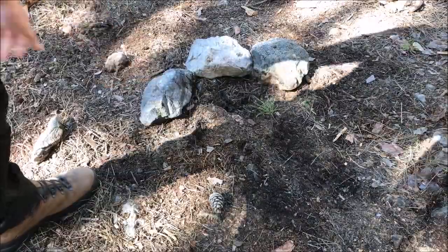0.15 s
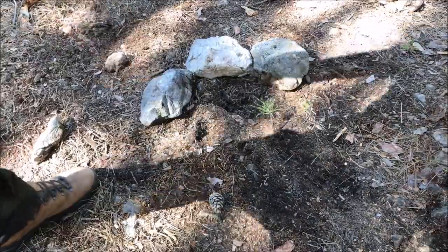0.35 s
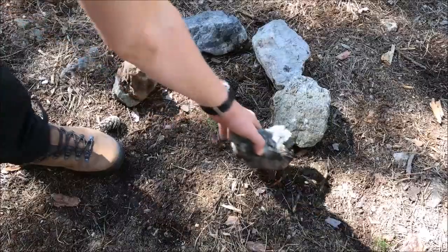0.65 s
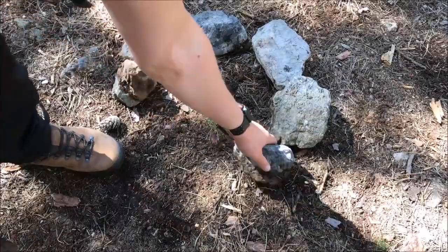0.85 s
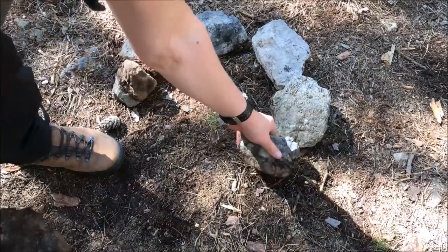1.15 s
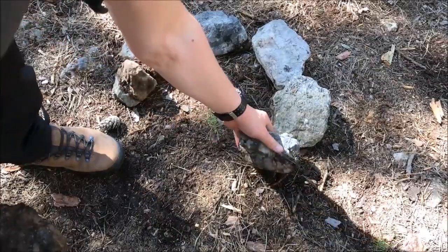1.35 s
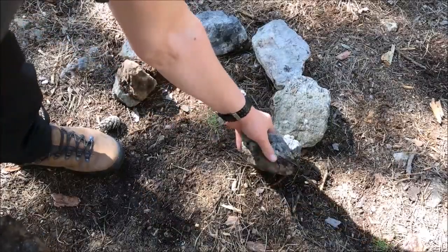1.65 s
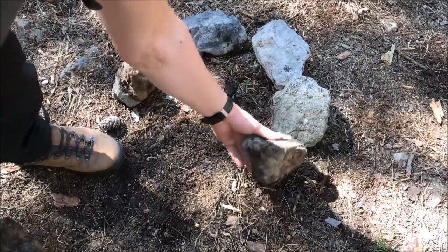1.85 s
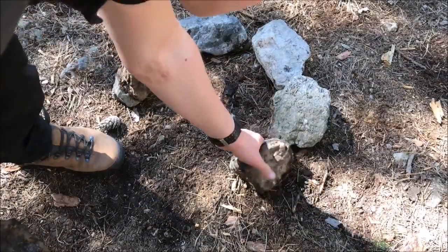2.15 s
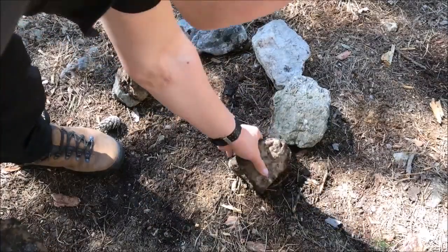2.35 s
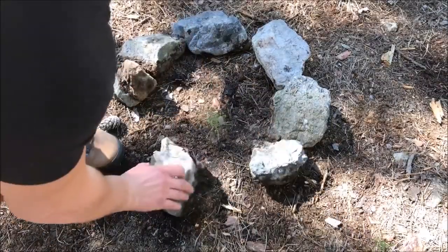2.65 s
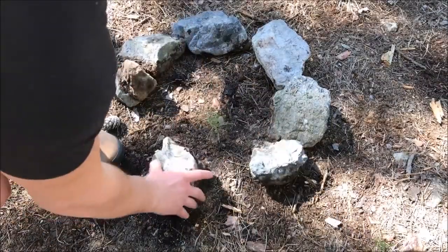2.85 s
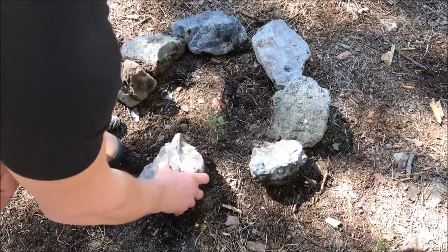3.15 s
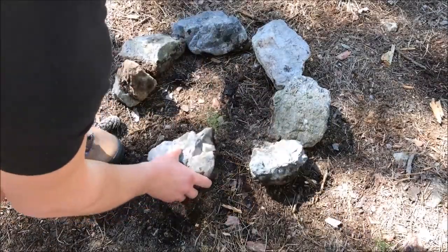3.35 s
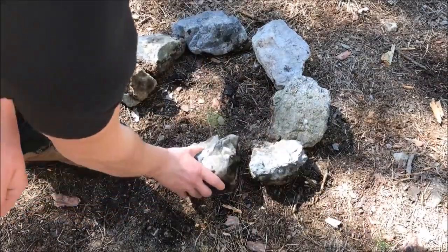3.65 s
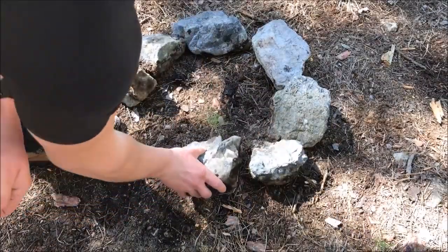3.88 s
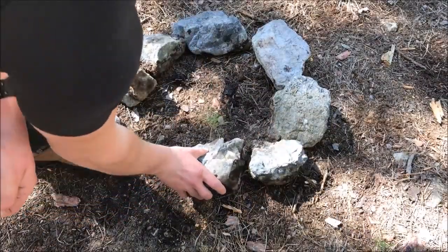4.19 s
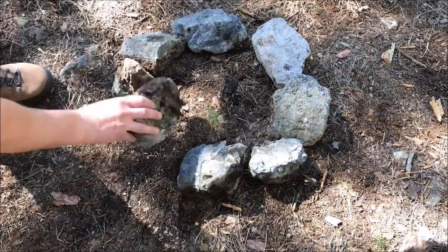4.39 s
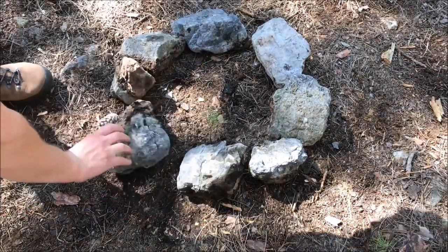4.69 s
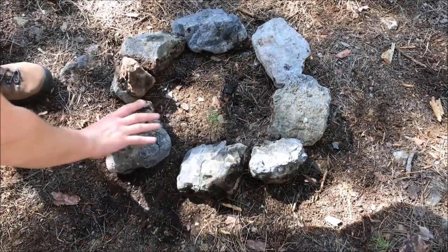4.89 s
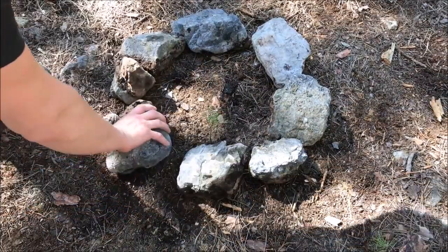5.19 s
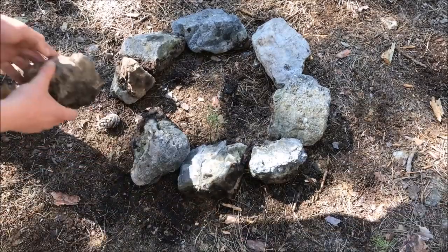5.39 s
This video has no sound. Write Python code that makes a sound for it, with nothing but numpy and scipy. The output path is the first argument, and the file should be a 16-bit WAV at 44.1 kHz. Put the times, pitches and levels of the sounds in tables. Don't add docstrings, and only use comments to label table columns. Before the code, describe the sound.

Faint pebble ticks and dry needle rustle lead to a hard stone knock just before one second, by far the sharpest. Softer knocks with dull soil thuds follow around two and two and a half seconds, a crisp snap near 3.8, and a heavy double clack and thump near 4.7. Close small single-channel microphone on dry open forest ground, with no room echo.

```python
import sys
import numpy as np
from scipy import signal
from scipy.fft import rfft, irfft, next_fast_len
from scipy.io import wavfile

SR = 44100
rng = np.random.default_rng(int(sys.argv[2]) if len(sys.argv) > 2 else 0)


def makeup_ratio(level_db):
    decades = np.asarray(level_db, float) / 20
    return 10 ** decades


def generate_wav(signal):
    frames = np.transpose(np.atleast_2d(signal))
    scaled = np.clip(frames, -1, 1) * 32767
    pcm = np.round(scaled).astype(np.int16)
    wavfile.write(sys.argv[1], SR, pcm)


N = 243720

# start_s [s, peak of the low click, start of the grit], peak_db
# [dB], pitch_hz [Hz], # upper_db [dB, upper click against peak], echo_db [dB against peak]
STONE_KNOCKS = [(.8797, -7.5, 1110, -21.5, -30), (.8819, -20, 1150, -22, -10),
                (0.8873, -32, 518.7, -42.5, -21.5), (0.9238, -42.5, 495, -24, -2),
                (1.2613, -46.5, 950, -35, -23), (1.2631, -55.5, 400, -40, -0.5),
                (2.0845, -19.5, 984, -21.5, -19), (2.0918, -30, 955, -33, -15),
                (2.1168, -25.5, 790, -21, -12), (2.1198, -35, 1050, -10, -4), (2.5515, -25, 787, -24, -8.5),
                (2.5543, -31.5, 380, -40, -13.5), (4.6589, -19.5, 1300, -36, -30),
                (4.6605, -17.5, 2250, -36, -18), (4.6611, -22, 950, -40, -30), (4.6631, -26, 950, -40, -30),
                (4.6642, -29, 900, -40, -12), (4.6638, -26.5, 296, -41.5, -24)]
# start_s [s, peak of the low click, start of the grit], peak_db [dB],
# pitch_hz [Hz]
PEBBLE_TICKS = [(.245, -58, 900), (.268, -59, 1300), (.29, -57, 1300), (.315, -54.5, 1200),
                (.343, -54, 1400), (.372, -56, 1250), (.4045, -49.5, 910), (.434, -53, 970),
                (.7555, -50.5, 567), (.857, -55, 1050), (.868, -57, 1100), (1.844, -57, 1551),
                (1.85, -57, 1500), (1.857, -52, 1510), (2.321, -58, 1100), (2.326, -54, 500),
                (3.7699, -49, 1200), (3.825, -60, 990), (4.4036, -48, 350), (4.43, -60, 1000),
                (4.723, -50.5, 810), (4.751, -49, 1000), (4.772, -53, 1150), (4.85, -55, 900),
                (4.865, -46, 720), (5.159, -63, 900), (5.427, -56, 1040)]


def knocks():
    out = np.zeros(N)
    t = np.arange(2600) / SR
    tick_upper_db, tick_echo_db = -14.5, -12
    ticks = [(*row, tick_upper_db, tick_echo_db) for row in PEBBLE_TICKS]
    for start_s, peak_db, pitch_hz, upper_db, echo_db in STONE_KNOCKS + ticks:
        click_s = start_s - .003
        low_click = click(pitch_hz, cycles=0.8 * (pitch_hz / 1100) ** 0.57)
        add(out, makeup_ratio(peak_db) * low_click, click_s)
        add(out, makeup_ratio(peak_db + upper_db) * click(3300, cycles=1.1), click_s - .0005)
        add(out, makeup_ratio(peak_db + echo_db) * click(0.97 * pitch_hz, cycles=0.44), click_s + 0.00289)
        add(out, makeup_ratio(peak_db + echo_db - 12) * click(.5 * pitch_hz, cycles=.45), click_s + 0.006417)

        noise = rng.standard_normal((2, len(t)))
        coarse_fade = makeup_ratio(16 - 60 * t / .019) + makeup_ratio(-25 - 60 * t / 0.06)
        grit = band(noise[0], 250, 1800) * coarse_fade
        grit += band(noise[1], 2200, 6000) * makeup_ratio(upper_db + 16 - 60 * t / 0.032)
        grit_db = -10.5 + .48 * upper_db
        add(out, makeup_ratio(peak_db + grit_db) * grit, start_s)
    return out


def click(pitch_hz, cycles):
    turns = (np.arange(440) / SR - .003) * pitch_hz
    width = np.where(turns < 0, 0.66 * cycles, cycles)
    sag = 0.13 * np.clip(turns, -1.2, 3) ** 2 / cycles
    swell = np.exp(-.5 * (turns / width) ** 2)
    return -swell * np.cos(2 * np.pi * (turns - sag - .04))


# [s, to fall 60 dB]
LANDINGS = [
    (0.8915, -30, 47, 0.003, 0.13),
    (1.2682, -56, 71, 0.018, 0.091),
    (2.0925, -42.5, 55, 0.003, 0.06),
    (2.1288, -32, 50, 0.005, 0.17),
    (2.562, -26.5, 48, 0.0055, 0.14),
    (3.585, -52, 110, 0.005, 0.12),
    (1.862, -59, 120, 0.005, 0.09),
    (4.671, -24, 47, 0.012, 0.077),
]


def soil_waves():
    out = np.zeros(N)
    lead_s, crest_hz = .0095, 96
    flutter_hz, flutter_db = 128, -13
    t = np.arange(13000) / SR - lead_s
    flutter = makeup_ratio(flutter_db) * np.cos(2 * np.pi * flutter_hz * t)
    rise = np.sin(np.pi / 2 * np.clip(1 + t / lead_s, 0, 1)) ** 1.9
    for crest_s, peak_db, last_hz, glide_s, fade_s in LANDINGS:
        extra_turns = (crest_hz - last_hz) * glide_s * (1 - np.exp(-t / glide_s))
        sweep = np.cos(2 * np.pi * (last_hz * t + extra_turns))
        add(out, makeup_ratio(peak_db - 60 * t / fade_s) * rise * (sweep + flutter), crest_s - lead_s)
    return out


# [dB, treble against the rest]
SNAPS = [(0.0117, -32.5, 18), (0.0832, -46, 6), (0.1, -53, 0), (0.2394, -54, 0), (0.2922, -51, 6),
         (0.3416, -53, -4), (0.3703, -55, -2), (0.4254, -42, 0), (0.4035, -51, -5), (0.4998, -54, 2),
         (1.3812, -54, 4), (1.6467, -54, 0.5), (1.8027, -54, 6), (1.8557, -52, 2), (2.11, -49, 7),
         (2.1237, -38, 0), (2.3191, -50, -5), (2.5425, -48, 1.5), (2.767, -46, -3), (2.8215, -48, 1),
         (3.0111, -50.5, 2), (3.7689, -27, 5), (3.8242, -40, 8), (4.3022, -46.5, 2), (4.4029, -50, -2),
         (4.594, -40.5, 6), (4.7824, -53.5, 0.5), (4.835, -47, -3), (5.146, -50.5, 1.5), (5.5069, -52, 8)]


def snaps():
    out = np.zeros(N)
    t = np.arange(1300) / SR
    fade = 0.3 * makeup_ratio(-60 * t / .0011) + makeup_ratio(-25 - 60 * t / 0.037)
    for start_s, peak_db, treble_db in SNAPS:
        jolt = 2 * (t == 0)
        force = rng.standard_normal(len(t)) * fade + jolt
        crack = band(force, 1500, 7000) - makeup_ratio(treble_db) * band(force, 7000, 17500)
        add(out, makeup_ratio(peak_db) * crack / np.abs(crack).max(), start_s + .0011)
    return out


# time_s [s], level_db [dB]
BUSTLE = [(0.0, -70.5), (.2, -70), (.38, -65.5), (0.55, -66.5), (1.05, -74.5), (1.48, -76.5), (2.54, -77),
          (2.64, -73), (2.97, -73), (3.1, -76.5), (4.35, -77.5), (4.42, -71), (4.6, -72), (4.77, -67.5),
          (5.05, -75), (5.43, -73.5), (5.53, -78)]
# pitch_hz [Hz], level_db [dB per Hz]
CRUNCH_TONE = [(76, -31), (130, -0.5), (183, -6.5), (255, 1), (370, -3.5), (996, -7.5), (1790, -16.5),
               (4000, -19), (5200, -42), (8800, -120)]
# pitch_hz [Hz], level_db [dB per Hz]
RUSTLE_TONE = [(880, -30), (1500, -4), (1760, -8.5), (1950, -6), (3450, -9), (5640, -6), (7700, -9),
               (9410, -8), (10500, -12.5), (12600, -6.5), (15100, -10.5), (15780, -10), (16000, -36)]
# [s, per 20 dB]
BRUSHES = [(0.005, -70, .1, .2), (.09, -70, .2, .3), (.43, -69, .04, .1), (.51, -67, .06, .55),
           (.86, -71, .6, .3), (.89, -66, .03, .12), (1.07, -75, .3, .15), (1.25, -75, .15, .45),
           (1.63, -77, .3, .2), (1.81, -67, .05, .12), (1.91, -67, .17, .06), (2.1, -71, .4, .05),
           (2.12, -68, .02, .025), (2.27, -76, .2, .15), (2.53, -73, .25, .4), (2.55, -66, .04, .05),
           (2.71, -72, .05, .18), (2.77, -71, .08, .24), (3.015, -69, .06, .04), (3.09, -75, .2, .16),
           (3.77, -70, .03, .06), (3.83, -71, .04, .03), (4.43, -70, .1, .6), (4.6, -66, .07, .12),
           (4.67, -66, .06, .3), (4.83, -70, .1, .3), (5.14, -76, .4, .4), (5.34, -74, .4, .1),
           (5.52, -71, .12, .1)]
# start_s [s], length_s [s], level_db [dB]
PUFFS = [(0.493, 0.063, -80), (0.875, 0.012, -64), (2.113, 0.014, -66), (2.535, 0.016, -64.5),
         (2.768, 0.015, -73), (2.841, 0.014, -72.5), (3.005, 0.0071, -72), (3.756, 0.025, -66),
         (3.812, 0.0082, -82), (4.304, 0.046, -82.5), (4.41, 0.039, -98), (4.588, 0.02, -73),
         (4.825, 0.022, -69)]


def litter():
    bustle_s, level_db = np.transpose(BUSTLE)
    bustle_db = np.interp(np.arange(N) / SR, bustle_s, level_db)
    swing_db = bustle_db - bustle_db.min()
    crunch = rng.standard_normal(N) + grains(300, spread_db=3.6)
    rustle = rng.standard_normal(N) + .8 * grains(550, spread_db=5.0)

    crunch = makeup_ratio(bustle_db + 1.5 * drift(25)) * coloured(crunch, CRUNCH_TONE)

    calm_db = -82.5
    rustle_db = swells(calm_db + .6 * swing_db, BRUSHES)
    gain = makeup_ratio(rustle_db + 0.99 * drift(40))
    for start_s, length_s, level_db in PUFFS:
        add(gain, makeup_ratio(level_db) * signal.windows.tukey(round(length_s * SR), .3), start_s)

    rustle = coloured(rustle, RUSTLE_TONE)
    coarse = signal.sosfiltfilt(signal.butter(2, 6500, fs=SR, output="sos"), rustle)
    coarse_gain = makeup_ratio(.6 * swing_db - .7)
    return crunch + gain * (rustle + (coarse_gain - 1) * coarse)


def grains(per_s, spread_db):
    sizes = makeup_ratio(spread_db * np.minimum(rng.exponential(1, N), 5)) * rng.choice([-1, 1], N)
    return sizes * (rng.random(N) < per_s / SR)


# [s, per 20 dB]
SHIFTS = [(.11, -67, .08), (.27, -48, .065), (.51, -57, .09), (.96, -53, .11), (1.14, -66.5, .4),
          (1.43, -66, .4), (1.86, -64, .1), (2.29, -53, .07), (2.37, -55.5, .06), (2.74, -51, .12),
          (2.93, -54, .17), (3.19, -59, .12), (3.29, -61, .12), (3.44, -63, .1), (3.6, -50, .11),
          (3.81, -54, .11), (3.97, -64, .15), (4.11, -52.5, .11), (4.29, -61.5, .1), (4.42, -49, .13),
          (4.54, -53, .2), (4.86, -55, .14), (5.09, -53, .08), (5.13, -52, .07), (5.2, -57, .08),
          (5.33, -60, .1)]
# pitch_hz [Hz], level_db [dB per Hz]
RUMBLE_TONE = [(13, -41), (22, -12.5), (42, 1.5), (60, -5.5), (72, -3), (95, -10.5), (129, -21), (250, -30),
               (320, -48), (550, -120)]


def rumble():
    feet = [(peak_s, level_db, .8 * fade_s, fade_s) for peak_s, level_db, fade_s in SHIFTS]
    stones = [(crest_s + .03, peak_db - 26, .03, .12) for crest_s, peak_db, *_ in LANDINGS]
    level_db = swells(-73, feet + stones)
    return makeup_ratio(level_db) * coloured(rng.standard_normal(N), RUMBLE_TONE)


def swells(floor_db, rows):
    t = np.arange(N) / SR
    level_db = floor_db + np.zeros(N)
    for peak_s, peak_db, rise_s, fade_s in rows:
        drop_db = 20 * np.maximum((peak_s - t) / rise_s, (t - peak_s) / fade_s)
        level_db = np.maximum(level_db, peak_db - drop_db)
    return level_db


def drift(rate):
    knots = rng.standard_normal(int(N / SR * 60) + 2)
    return np.interp(np.arange(N) / SR * rate, np.arange(len(knots)), knots)


def coloured(x, tone):
    pitch_hz, level_db = np.transpose(tone)
    size = next_fast_len(N)
    log_hz = np.log(np.fft.rfftfreq(size, 1 / SR) + 1)
    shape_db = np.interp(log_hz, np.log(pitch_hz), level_db, left=-60, right=-60)
    shaped = irfft(rfft(x, size) * makeup_ratio(shape_db), size)[:N]
    return shaped / np.sqrt(np.mean(shaped ** 2) + 1e-20)


def band(x, low_hz, high_hz):
    return signal.sosfilt(signal.butter(2, [low_hz, high_hz], "band", fs=SR, output="sos"), x)


def add(out, sound, start_s):
    at = max(round(start_s * SR), 0)
    out[at:at + len(sound)] += sound[:N - at]


def scene():
    return (knocks() + soil_waves() + snaps() + litter() + rumble())[None]


# [Hz, lowest lost pitch]
TREBLE_GAPS = [(.062, .016, 1500), (.467, .022, 1500), (.938, .016, 1500), (2.237, .016, 1200),
               (2.963, .016, 1500), (3.004, .014, 1500), (3.921, .018, 1500), (4.372, .016, 3500),
               (4.755, .014, 1500), (4.807, .026, 1500), (4.968, .014, 2500)]


def treble_gaps(x):
    size = 4096
    t = (np.arange(size) - size / 2) / SR
    hz = np.fft.rfftfreq(size, 1 / SR)
    band_of = (np.sqrt(hz) / 1.7).astype(int)
    for middle_s, length_s, low_hz in TREBLE_GAPS:
        spared = rng.random(90) < .14 + 200 / (np.arange(90) * 1.7 + 1) ** 2
        lost = (hz > low_hz) & ~spared[band_of]
        change = np.where(lost, -.93, .9 * (hz > low_hz))
        start = round(middle_s * SR) - size // 2
        gap = np.exp(-np.abs(t / (.55 * length_s)) ** 3)
        add(x[0], gap * irfft(rfft(x[0, start:start + size]) * change), start / SR)


def roll_off(x):
    return signal.sosfilt(signal.butter(12, 16660, fs=SR, output="sos"), x)


def record(dry):
    x = signal.sosfilt(signal.butter(3, 36, "high", fs=SR, output="sos"), dry)
    x = signal.sosfilt(signal.cheby2(10, 24, 16650, fs=SR, output="sos"), x)
    treble_gaps(x)
    return roll_off(x)


dry = scene()
out = record(dry)
generate_wav(out)
```